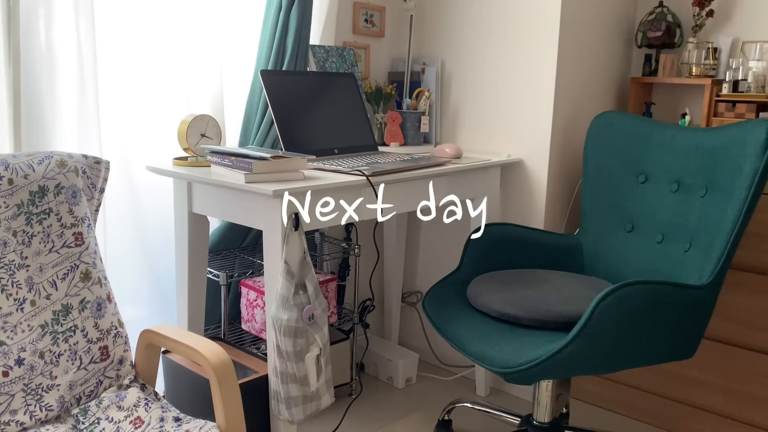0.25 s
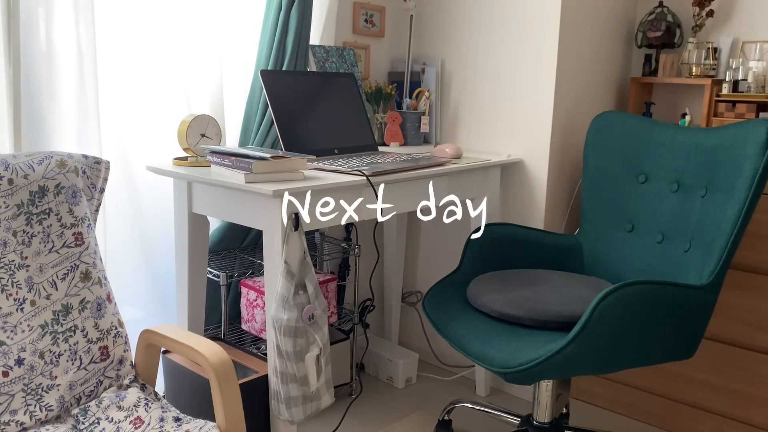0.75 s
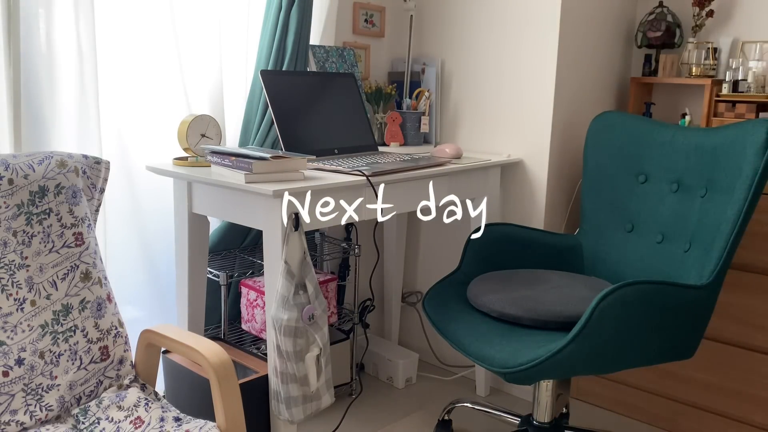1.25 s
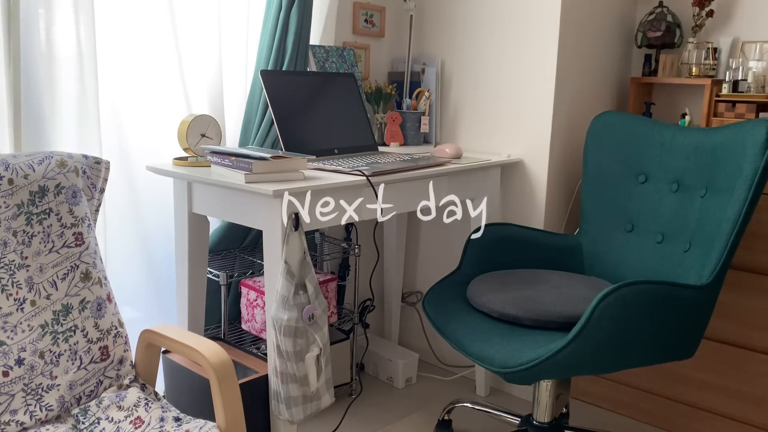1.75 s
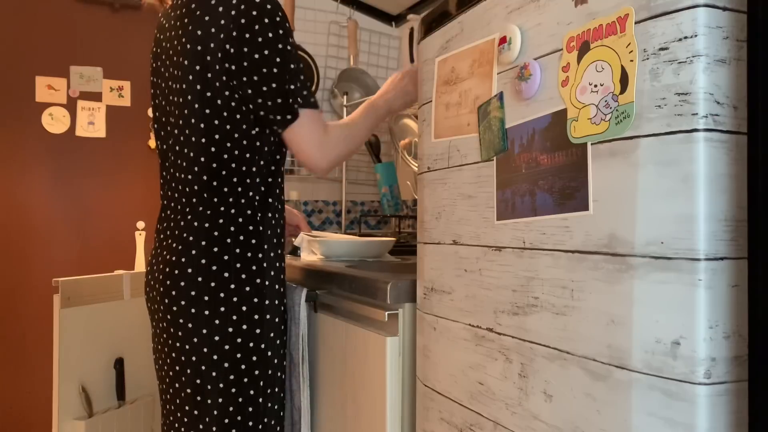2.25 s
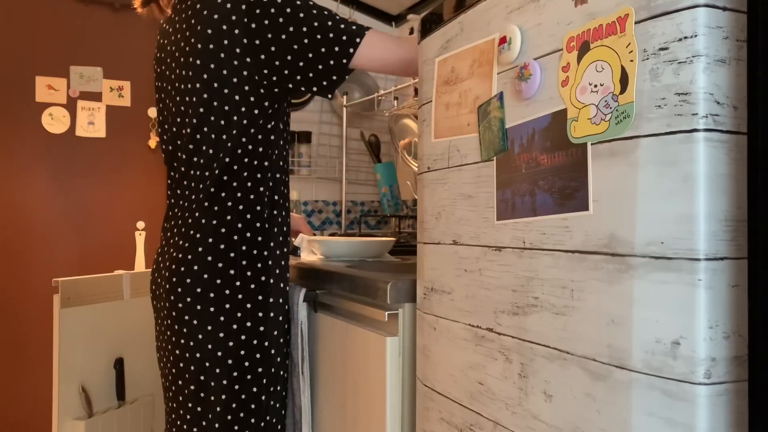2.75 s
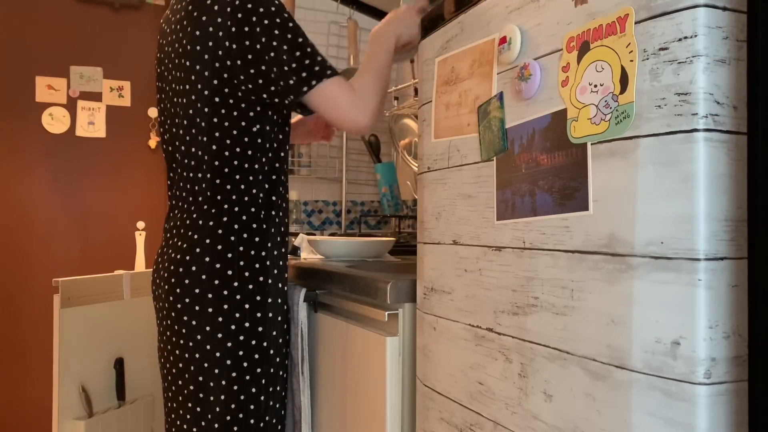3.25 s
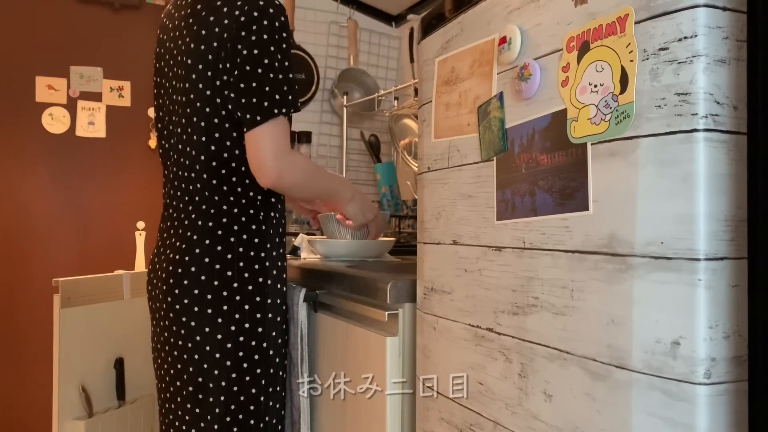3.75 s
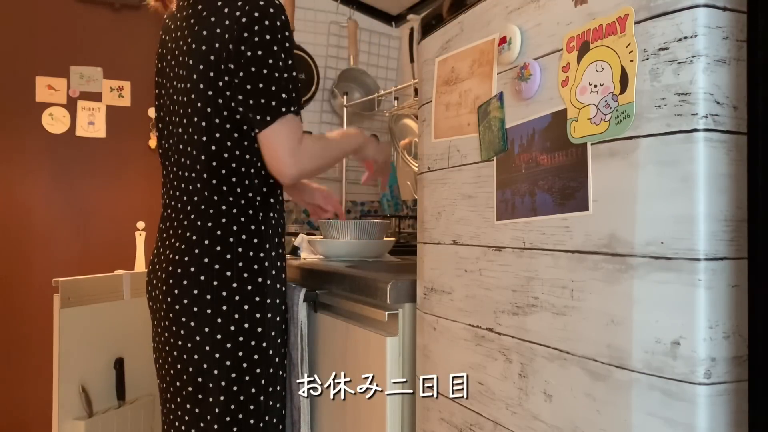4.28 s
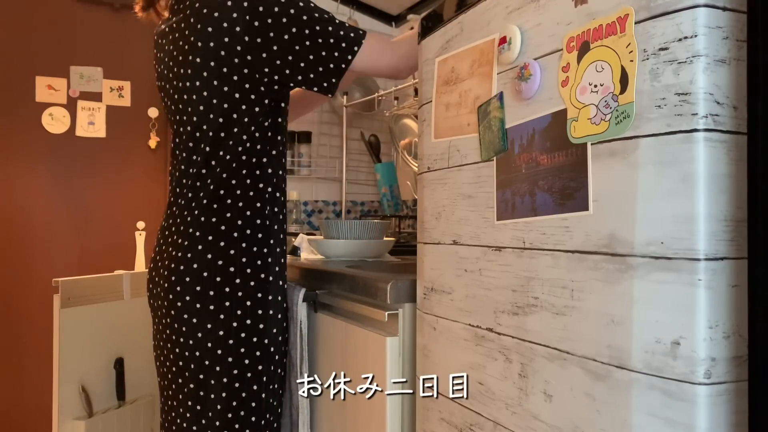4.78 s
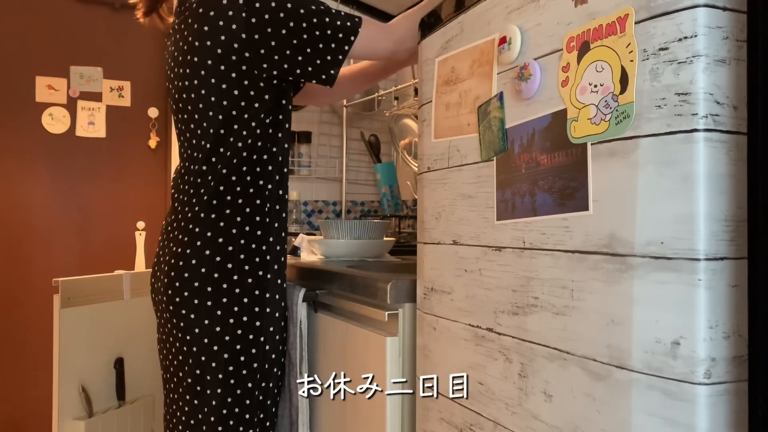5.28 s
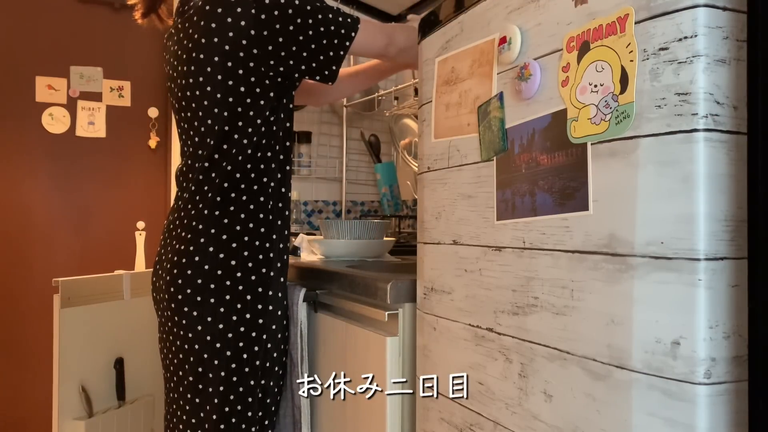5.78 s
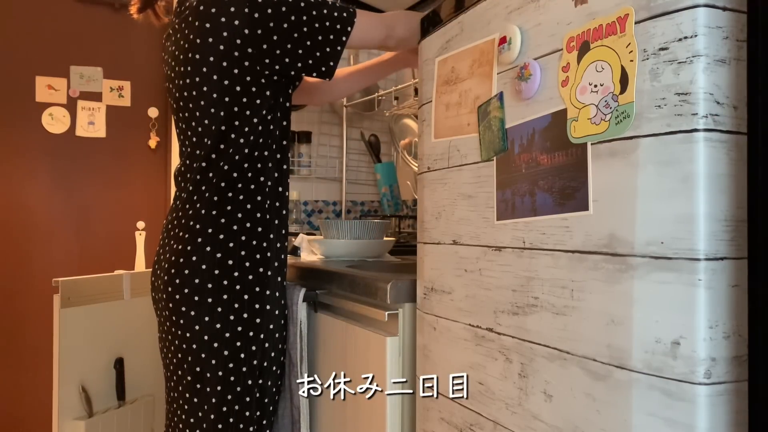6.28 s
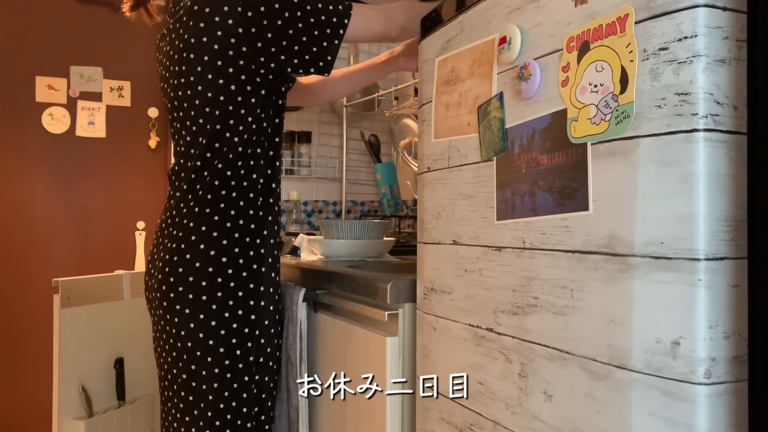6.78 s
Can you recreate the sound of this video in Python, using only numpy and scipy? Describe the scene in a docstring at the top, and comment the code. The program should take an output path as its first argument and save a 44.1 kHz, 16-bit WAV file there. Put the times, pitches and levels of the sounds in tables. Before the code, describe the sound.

Soft bumps near the microphone, cupboard knocks, a swinging pot lid, a ringing bowl set down, then bright cutlery clinks and jingling in a small kitchen.

```python
"""Cutlery shifting on a kitchen shelf: bright clinks and a loose jingle, each struck piece ringing on its modes.
Before and around it come soft bumps near the microphone, cupboard knocks, cloth rustles, a hanging pot lid
that swings against its rail, and a bowl set down. Blows are sharp ticks with a short noisy room tail, coloured
by ringing modes; bumps are sinking tones in narrow rumble. Under all lie shaped noise and a low hum.
The two microphone ports share bass and treble."""
import sys
import numpy as np
from scipy import signal
from scipy.fft import rfft, irfft, next_fast_len
from scipy.io import wavfile
from scipy.ndimage import uniform_filter1d

SR = 44100
rng = np.random.default_rng(int(sys.argv[2]) if len(sys.argv) > 2 else 0)


def output_pcm(signal):
    """Save a mono or channel-first signal as 16-bit PCM at the path in sys.argv[1].

    Samples are clipped to [-1, 1] before scaling.
    """
    pcm = np.clip(np.atleast_2d(signal).T, -1, 1) * 32767
    wavfile.write(sys.argv[1], SR, np.round(pcm).astype(np.int16))


N = 310023
SPAN = 32768  # samples in one blow with its tail
T = np.arange(SPAN) / SR  # [s]
F = np.arange(SPAN // 2 + 1) * SR / SPAN + 1  # [Hz], raised by 1 so that its logarithm exists
LEAD_S = .003  # a blow starts to build this long before its first tick, which falls at the listed time

# Room decay bands: (centre [Hz], T60 [s])
BANDS = [(500, 0.54), (1400, 0.43), (4200, 0.39), (11000, 0.25)]
# Ringing modes of the cutlery, one per column; rows: (frequency [Hz], level [dB], T60 [s])
CUTLERY = [(3838, 5500, 6110, 7068, 7900, 8741, 8904, 9780, 10321, 10720, 10938, 12450, 13787, 13881, 14038, 14337),
           (-3, -4, -4, -5, -4, 6, 4, -3, -3, .1, -1.5, -5, 3, 1.5, 3, -3),
           (.1, .05, .06, .07, .15, .1, .12, .1, .1, .1, .1, .1, .15, .15, .15, .12)]
STEEL_DB = (-2.5, -6.5, -6.5, 3.5)  # colour of steel [dB at each of BANDS]


def undb(db):
    """Decibels to amplitude."""
    return 10 ** (np.asarray(db) / 20)


def unit(x):
    """Scale to rms 1."""
    return x / np.sqrt(np.mean(x ** 2))


def on_log(hz, table):
    """Read (Hz, value) rows on a log-frequency axis."""
    table_hz, values = np.transpose(table)
    return np.interp(np.log(hz), np.log(table_hz), values)


def add(out, s, sound):
    """Mix a sound in at time s."""
    i = int(s * SR)
    out[:, i:i + SPAN] += sound[:, :N - i]


def walk(rate):
    """Random levels held 1 / rate s, then smoothed twice."""
    hold = int(SR / rate)
    steps = np.repeat(rng.standard_normal(N // hold + 1), hold)
    return uniform_filter1d(uniform_filter1d(steps, hold), hold)[:N]


def swell(contact_s, t60, late_s=0.36):
    """Builds while the contact lasts, then decays; the last of the tail falls away faster."""
    after = np.maximum(T - contact_s, 0)
    build = 1 - np.exp(-T / (0.0014 + 0.26 * contact_s))
    return build * undb(-60 * after / t60 - 10 * (after / late_s) ** 2)


def rumble(hz, width_hz):
    """Noise in a narrow band."""
    noise = rfft(rng.standard_normal((2, SPAN)))
    return unit(irfft(noise / (1 + ((F - hz) / width_hz) ** 2) ** 2))


def ticks(contact_s, count=7):
    """A first touch and a few bounces, each a sharp click with a fast-dying burst of noise."""
    bounce_s, bounce_fall_db = .03, 11  # chatter beyond the contact; greatest loss of a late, light bounce
    when, size = rng.random((2, count))
    when[0] = size[0] = 0  # the first touch comes at once, at full strength
    touch = np.zeros(SPAN)
    at = ((LEAD_S + when * (contact_s + bounce_s)) * SR).astype(int)
    touch[at] = undb(-bounce_fall_db * (when + size) / 2)
    burst = signal.lfilter([1], [1, -np.exp(-1 / (0.0005 * SR))], touch)  # 0.5 ms decay
    return 4 * touch + rng.standard_normal((2, SPAN)) * [[1], [.6]] * burst


def echo(band_db, contact_s, rattle_db, tail):
    """The room's answer to one blow: noise in overlapping bands, each dying at its own rate, scaled by tail."""
    noise, out = rfft(rng.standard_normal((2, SPAN))), 0
    for k, (db, (_, t60)) in enumerate(zip(band_db, BANDS)):
        corners = [(200, 0.0045)] + [(band[0], j == k) for j, band in enumerate(BANDS)]
        share = on_log(F, corners) ** 2
        out = out + undb(db) * unit(irfft(noise * share)) * swell(contact_s, tail * t60)
    return out * undb(rattle_db * walk(160)[:SPAN])  # small contacts follow one another unevenly


def ring(sound, modes, ring_db, stray_db, clink_hz, count=40):
    """The struck thing's modes colour the blow; neighbours that it shakes add stray modes, new every time."""
    clink_db, clink_t60_s = 14.5, 0.05  # the piece that is struck rings on its own pitch
    stray = rng.random((3, count))
    hz = np.r_[modes[0], clink_hz, 900 + 14500 * stray[0] ** 1.3]
    db = np.r_[np.add(modes[1], ring_db), [clink_db] * len(clink_hz), stray_db - 8 * stray[1]]
    db = db + 2 * rng.standard_normal(len(hz))  # every blow excites the modes a little differently
    t60 = np.r_[modes[2], [clink_t60_s] * len(clink_hz), .02 + .06 * stray[2]]
    damping = np.log(1000) / t60
    poles = 1 / (damping[:, None] + 2j * np.pi * (F - hz[:, None]))
    response = 1 + (undb(db) * damping) @ poles  # the blow itself plus its ringing
    return irfft(rfft(sound) * response) * np.cos(np.pi / 2 * T / T[-1])  # fades out by the end of the span


def blows(out, hits, modes, colour_db, tick_db, stray_db, rattle_db, tail, top_hz):
    """Each blow: sharp ticks and the room's echo, both through the ring of the struck thing."""
    pivot_hz = 2400  # brightness tilts about this frequency
    hz = np.array(BANDS)[:, 0]
    lowpass = signal.butter(8, top_hz, fs=SR, output="sos")
    for s, db, brightness, contact_s, ring_db, *clink_hz in hits:
        band_db = db + brightness * np.log2(hz / pivot_hz) + colour_db
        colour = undb(tick_db + on_log(F, np.c_[hz, band_db])) * F / (F + hz[0])  # ticks have little bass
        tick = irfft(rfft(ticks(contact_s)) * colour)
        room = echo(band_db, contact_s, rattle_db, tail)
        sound = ring(tick + room, modes, ring_db, stray_db, clink_hz)
        add(out, s - LEAD_S, signal.sosfilt(lowpass, sound))


def air():
    """Room rumble and hiss in octave bands that flicker alone, and a wavering hum of narrow-band noise."""
    level_db, hum_hz = -59.5, 153.5
    # Spectrum of the room noise: (frequency [Hz], relative density [dB])
    spectrum = [(15, -33.5), (25, -12), (53, 4.5), (154, -8), (197, -9), (296, -8.5), (368, -19.5),
                (1360, -38.5), (6000, -47.5), (9330, -41.5), (14000, -48), (16500, -50)]
    # Slow drift of the low end: (time [s], hum level [dB], relative lift of the lowest octaves [dB])
    drift = [(0, -76, -15), (2.0, -69.5, 1.5), (2.299, -66.5, 1), (5.502, -63.5, 3), (5.948, -56, 6),
             (7.03, -71, 4.5)]
    hz = np.arange(N // 2 + 1) * SR / N + 1
    noise = rfft(rng.standard_normal((2, N))) * undb(on_log(hz, spectrum))
    s, *columns = np.transpose(drift)
    hum_db, rumble_db = (np.interp(np.arange(N) / SR, s, column) for column in columns)
    out = 0
    for octave in range(4, 15):  # centred on 2 ** octave Hz
        share = np.clip(1 - abs(np.log2(hz) - octave), 0, 1)
        depth_db = 2.5 if octave < 9 else .6
        out = out + irfft(noise * share, N) * undb(depth_db * walk(8.1) + rumble_db * (octave < 7))
    hum = unit(irfft(rfft(rng.standard_normal((2, N))) / (1 + ((hz - hum_hz) / 9) ** 2), N))
    return undb(level_db) * unit(out) + hum * undb(hum_db)


def rustles(out):
    """Cloth rustles: drawn-out contacts with faint ticks and only stray modes, so nothing rings for long."""
    # Rustles: (time [s], level [dB], brightness [dB per octave], contact [s])
    moves = [(0.099, -76.5, -0.5, 0.055), (0.252, -81.5, -5, 0.2), (1.845, -67, 2.5, 0.032),
             (5.757, -59, 8, 0.12), (6.519, -72, 5, 0.26), (6.606, -61.5, 8.5, 0.042)]
    cloth_db, unringing = (-0.5, -8, -5.5, -5.5), ((), (), ())  # colour [dB at each of BANDS]; no modes
    hits = [tuple(row) + (0,) for row in moves]
    blows(out, hits, unringing, cloth_db, tick_db=-13, stray_db=7.0, rattle_db=0.5, tail=0.92, top_hz=18000)


def bumps(out):
    """Dull blows on furniture: a low tone sinking fast to its pitch amid rumble; the cupboard booms on."""
    # Bumps: (time [s], thud level [dB], settled pitch [Hz], cupboard boom level [dB])
    hits = [(0.012, -54, 248, -69), (0.162, -55, 197, -73), (0.26, -49, 222.4, -61),
            (0.33, -32.5, 154.2, -46), (0.439, -32.5, 133, -48), (0.97, -46.5, 131, -60),
            (1.869, -55.5, 181, -55), (2.3, -33.5, 175, -38.5), (2.654, -41.5, 226, -48),
            (2.747, -40.5, 396.6, -45), (2.849, -43, 116, -54), (3.98, -34.5, 146, -40.5),
            (5.865, -46.5, 185.3, -66), (5.994, -42, 156.7, -59), (6.775, -48, 212.7, -48)]
    highpass = signal.butter(2, 50, "high", fs=SR, output="sos")
    for s, db, hz, boom_db in hits:
        tone = np.sin(2 * np.pi * hz * (T + 0.0033 * (1 - np.exp(-T / 0.0056))))
        shared_tone = tone * np.array([[1], [0]])  # the tone is common to both ports
        thud = undb(db) * swell(0.0025, 0.37) * (shared_tone + .5 * rumble(hz, 230))
        boom = undb(boom_db) * swell(0.036, 0.83, 0.2) * rumble(74.8, 35)
        add(out, s, signal.sosfilt(highpass, thud + boom))


def knocks(out):
    """Cupboard knocks: ticks and room tail through a few fast-dying wooden modes."""
    # Knocks: (time [s], level [dB], brightness [dB per octave], contact [s], ring [dB])
    hits = [(0.428, -66.5, -4, 0.0028, 3.5), (0.648, -86, -6, 0.0042, -2.5), (0.965, -60, -1, 0.0044, 6),
            (1.272, -77.5, 2.5, 0.0021, -20), (1.946, -73.5, 7, 0.0025, -2),
            (2.284, -40.5, 1.15, 0.038, -13.5), (2.639, -45, 0.7, .025, -19), (2.739, -48, 2.1, 0.014, -15),
            (3.047, -73, 0.5, 0.0033, 10), (3.223, -81, 2.5, 0.003, -8), (5.317, -71, 5.5, 0.0045, -17.5)]
    # Modes of the wood, one per column; rows: (frequency [Hz], level [dB], T60 [s])
    modes = [(583, 720, 1010, 820, 1550), (.1, 4.1, 8.4, 2.3, 2.8), (0.0414, 0.019, .025, .025, .02)]
    wood_db = (0.36, -2, -4, -2.5)  # colour [dB at each of BANDS]
    blows(out, hits, modes, wood_db, tick_db=8, stray_db=2, rattle_db=0.5, tail=0.75, top_hz=17500)


def pot_lid(out):
    """The hanging lid strikes its rail: harder hits are brighter, and its plate modes ring briefly."""
    # Hits of the lid: (time [s], level [dB])
    swings = [(2.902, -51.5), (3.012, -60.5), (3.141, -64.5), (3.265, -70.5), (5.554, -82.5), (5.68, -57),
              (5.923, -62)]
    # Modes of the lid, one per column; rows: (frequency [Hz], level [dB], T60 [s])
    modes = [(587, 980, 1141, 1432, 1879, 1954, 2417, 2950), (-8, 5, 3, -8, 3, 3, -7, .1),
             (.15, .08, .12, .1, .1, .1, .1, .08)]
    lid_db = (-4, 1, -0.5, -26)  # colour [dB at each of BANDS]
    flat_db, brightens = -69, 0.34  # no tilt at this level; dB per octave brighter for each dB harder
    contact_s, ring_db = 0.0045, 16.5
    hits = [(s, db, brightens * (db - flat_db), contact_s, ring_db) for s, db in swings]
    blows(out, hits, modes, lid_db, tick_db=16.5, stray_db=-4.5, rattle_db=0.0, tail=0.78, top_hz=2860)


def bowl(out):
    """A bowl set down: a few touches excite its modes, of which the lowest rings longest."""
    # Touches of the bowl: (time [s], level [dB], brightness [dB per octave], contact [s], ring [dB])
    hits = [(3.962, -41.5, 2.5, 0.004, 14), (4.069, -46.5, 1.53, 0.024, 14.5), (4.2, -66.5, -4, 0.016, 4.5)]
    # Modes of the bowl, one per column; rows: (frequency [Hz], level [dB], T60 [s])
    modes = [(875, 932, 1082, 1123, 1372, 1520, 1815, 2830, 3300, 4070, 4963, 5426, 7687, 10150),
             (5, 1.5, 6, 5, 3, -1.5, 8, 4, 1.5, -1.5, 3, -3, -4, -5),
             (1.3, .15, .1, .2, .05, .04, .5, .35, .07, .06, .07, .1, .05, .06)]
    bowl_db = (-4.5, 5, -9.5, 2)  # colour [dB at each of BANDS]
    blows(out, hits, modes, bowl_db, tick_db=10.5, stray_db=2.0, rattle_db=2.5, tail=0.77, top_hz=11200)


def jingle(out, count=22):
    """Loose pieces clink at random while the pile shifts, each on its own pitch."""
    low, high = np.array([(5.76, -64.5, 2800), (6.3, -57, 6700)])  # ranges of (time [s], level [dB], pitch [Hz])
    clinks = low + (high - low) * rng.random((count, 3))
    hits = [(s, db, 0, 0, 0, hz) for s, db, hz in clinks]
    blows(out, hits, CUTLERY, STEEL_DB, tick_db=15.5, stray_db=-5.5, rattle_db=1.0, tail=0.26, top_hz=9000)


def cutlery(out):
    """Cutlery shifted on a shelf: steel modes ring with the struck piece's own pitch among stray ones."""
    # Hits: (time [s], level [dB], brightness [dB per octave], contact [s], ring [dB], struck piece [Hz])
    hits = [(2.7766, -50, 2.5, 0.026, -12, 5520), (4.844, -66, 3, 0.048, -6, 2200),
            (4.876, -74, -1.5, 0.0078, -6, 7900), (5.01, -55, 5.5, 0.026, -2, 5530),
            (5.0909, -51, 4.5, 0.0082, 3, 6200), (5.797, -54.5, 6, 0.023, 10, 14200),
            (5.9653, -48, 6, 0.025, -3, 10250), (6.0853, -45, 5, 0.0082, 0, 3150),
            (6.133, -49, 10.5, 0.0061, 14.5, 3830), (6.141, -48, 9, 0.0018, 13.5, 6090),
            (6.2278, -59.5, 10.5, 0.0036, 10, 4800), (6.238, -75.5, 8, 0.0025, 12, 3830),
            (6.6299, -62, 5, 0.0073, -9, 10200), (6.7521, -42.5, 3.5, 0.0073, 11, 4730),
            (6.9513, -60, 7.5, 0.0012, -7, 10700), (6.994, -55, 10.5, 0.004, 3, 6620),
            (7.016, -64, 8, .003, 4, 6620)]
    blows(out, hits, CUTLERY, STEEL_DB, tick_db=5, stray_db=9.5, rattle_db=1.0, tail=0.96, top_hz=14830)


def scene():
    """Lay every source over the room air; the two rows are the shared and the unshared field."""
    out = air()
    for source in (rustles, bumps, knocks, pot_lid, bowl, jingle, cutlery):
        source(out)
    return out


def record(dry):
    """Two ports mix the shared and the unshared field; the treble reaches the left port later."""
    lag_s, top_hz = 1 / 4650, 15900
    left_bass_db, bass_hz = -0.9, 349.7  # the left port hears a little less bass
    # Likeness of the ports: (frequency [Hz], left-right correlation [0 to 1])
    likeness = [(150, .96), (300, .75), (700, .1), (5000, .05), (7000, .62), (9000, .993)]
    size = next_fast_len(N + SPAN)
    hz = np.arange(size // 2 + 1) * SR / size + 1
    like = on_log(hz, likeness)
    shared, apart = rfft(dry, size) * np.sqrt([(1 + like) / 2, (1 - like) / 2])
    lag = np.exp(-2j * np.pi * hz * lag_s * (hz > 1 / lag_s))  # only the treble is late
    left_bass = undb(left_bass_db / (1 + (hz / bass_hz) ** 2))
    ports = irfft([(shared + apart) * lag * left_bass, shared - apart], size)[:, :N]
    return signal.sosfilt(signal.ellip(10, .2, 80, top_hz, fs=SR, output="sos"), ports)  # steep treble cut


dry = scene()
out = record(dry)
output_pcm(out)
```